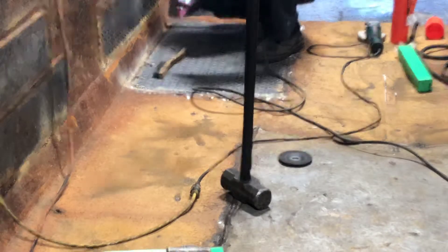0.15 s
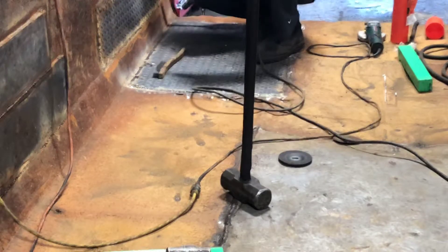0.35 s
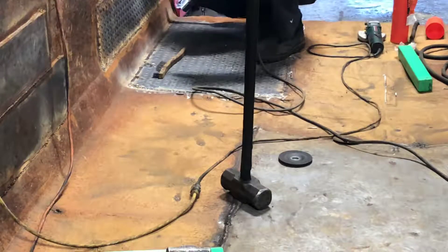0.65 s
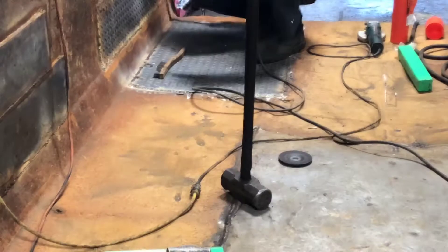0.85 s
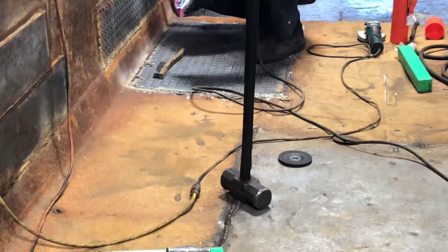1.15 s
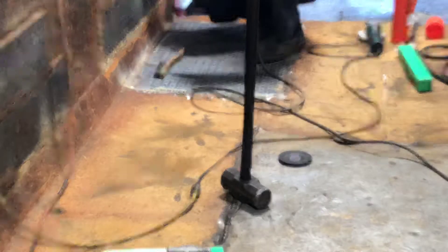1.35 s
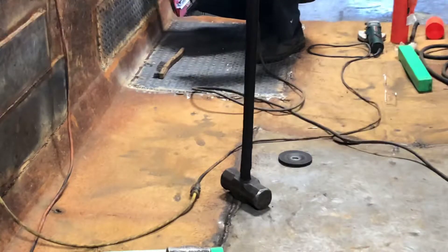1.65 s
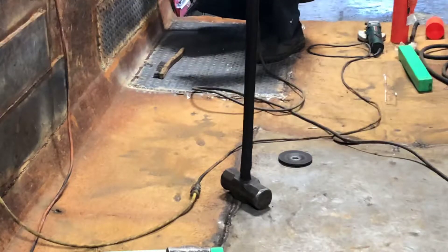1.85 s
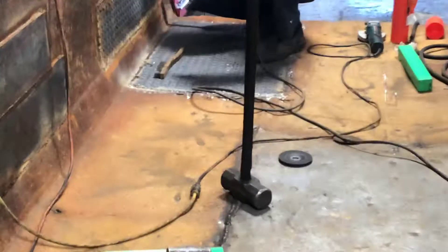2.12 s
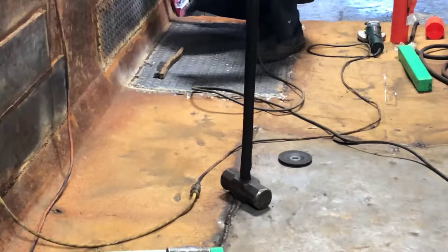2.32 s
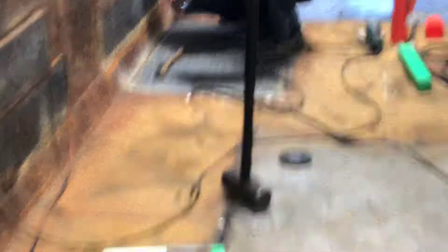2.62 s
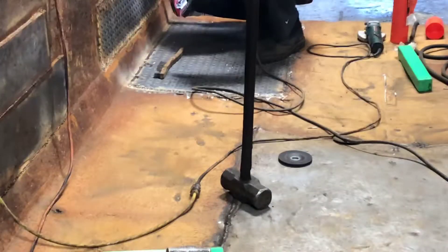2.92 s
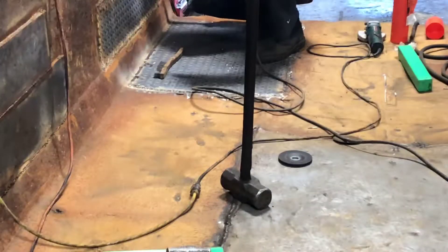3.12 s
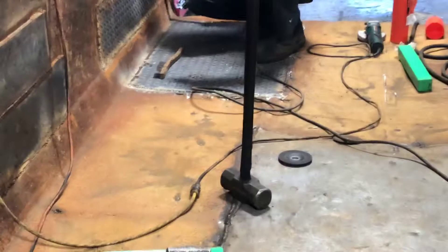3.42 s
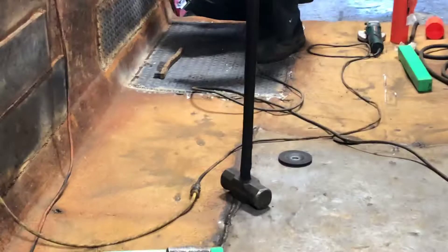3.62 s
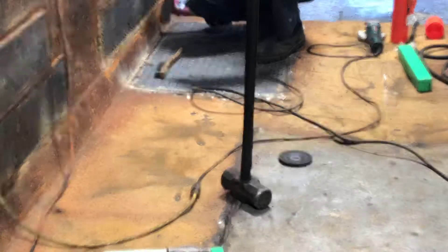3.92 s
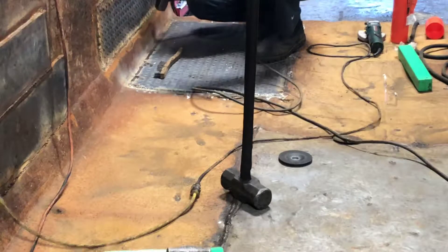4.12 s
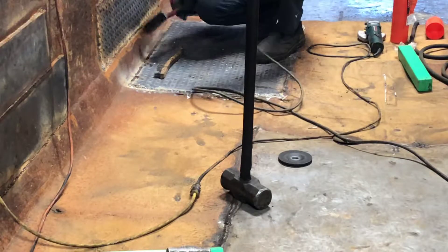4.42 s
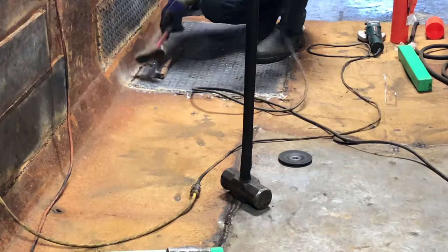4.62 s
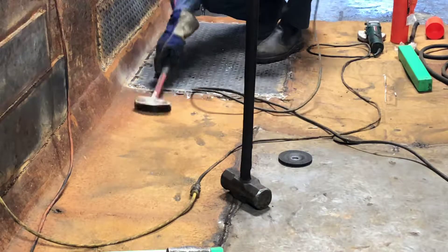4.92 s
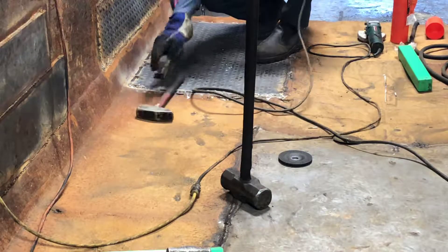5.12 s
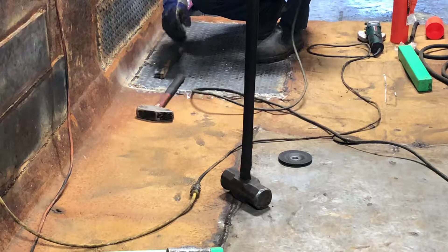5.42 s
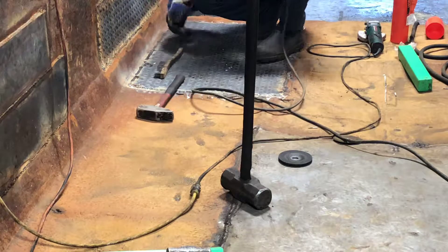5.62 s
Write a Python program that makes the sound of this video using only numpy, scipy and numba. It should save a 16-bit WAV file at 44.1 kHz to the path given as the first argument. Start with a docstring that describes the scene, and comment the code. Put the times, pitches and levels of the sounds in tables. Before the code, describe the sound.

The clip opens in the fading ring of an earlier hammer blow in a reverberant workshop. Seven heavy blows on a big steel plate body follow at about 0.1, 0.7, 1.3, 1.95, 2.6, 3.25 and 3.9 seconds. Each starts with a hard, bright metallic crack and spreads into a dense, mid-low boom with ringing that lasts into the next blow. Their colour shifts a little: the third is lower, the fifth brightest and most clangy. The last ring decays for about a second. From 4.9 to 5.3 seconds the hammer is laid on the steel floor, with a quick cluster of much quieter clacks ending in duller handle thuds. A deep, wavering floor hum near 120 hertz swells and fades. Soft clothing rustles appear around 5.2 and 5.7 seconds over a faint, low machine wash. A close phone microphone squashes the blows to similar loudness.

```python
"""In a workshop, seven even hammer blows land on a big steel plate body, while an earlier blow still hangs in the hall.
Each blow is a hard crack of noise and resonances, then a boom of noise and fading tones, spreading through plates and hall.
The hammer is then laid on the steel floor and rocks to rest: knocks of noise and tones, and a deep drone.
Clothes rustle (swelling noise) over a low steady wash of distant machines (noise).
A phone stands close by; its limiter flattens every blow."""
import sys
import numpy as np
from scipy import signal
from scipy.fft import rfft, irfft
from scipy.io import wavfile
from numba import njit

SR = 44100
rng = np.random.default_rng(int(sys.argv[2]) if len(sys.argv) > 2 else 0)


def dump_mix(stems):
    """Bounce the given channels to the path in sys.argv[1] as a 16-bit WAV at rate SR."""
    frames = np.atleast_2d(stems).T  # one column per channel
    limited = np.clip(frames, -1, 1)  # hard clip at full scale
    pcm = np.round(limited * 32767).astype(np.int16)
    wavfile.write(sys.argv[1], SR, pcm)


N = 253927  # length of the scene in samples
AGE = np.arange(2 * SR) / SR  # seconds since a blow or knock
TOP_HZ = 15850  # nothing much is heard above this

# How long plates and hall ring. Each row: frequency in Hz, time to fall by 60 dB in seconds.
RING_TIMES = [(60, 2.26), (160, 1.22), (420, 0.92), (1100, 1.362), (2900, 1.375), (5000, 0.99), (8000, 0.8),
              (14000, 0.71)]
# Colour of the crack of steel on steel. Each row: frequency in Hz, relative level in dB per Hz.
CRACK_COLOUR = [(100, -7), (250, 9), (800, -6.5), (1400, 2), (3000, -3.5), (4600, -2.5), (6500, -10),
                (8000, -8), (8500, -16), (15500, -31.5)]


def undb(db):
    """Turn decibels into a gain."""
    return 10 ** (np.asarray(db) / 20)


def unit(x):
    """Scale a sound to an average (rms) level of 1."""
    return x / np.sqrt(np.mean(x ** 2))


def lookup(table, hz):
    """Read between (Hz, value) points, with pitch on a logarithmic axis."""
    f, value = np.transpose(table)
    return np.interp(np.log(np.maximum(hz, 1)), np.log(f), value)


def colour(x, table):
    """Make each frequency louder or softer, following (Hz, dB) points."""
    hz = np.fft.rfftfreq(len(x), 1 / SR)
    return irfft(rfft(x) * undb(lookup(table, hz)), len(x))


def noise(table, size, patchy_db=0, patch_hz=40):
    """Coloured noise of rms 1; crowded modes can leave its spectrum uneven."""
    hz = np.fft.rfftfreq(size, 1 / SR)
    knots = np.arange(0, SR / 2, patch_hz)
    patches = np.interp(hz, knots, rng.standard_normal(len(knots)))
    gain = undb(lookup(table, hz) + patchy_db * patches)
    white = rng.standard_normal(size)
    return unit(irfft(rfft(white) * gain, size))


def fade(t60):
    """Die away steadily, by 60 dB in t60 seconds."""
    return np.exp(-np.log(1000) * AGE / t60)


def swell(seconds):
    """Build up energy with this time constant."""
    return 1 - np.exp(-AGE / max(seconds, 1e-4))


def resonance(x, hz, width):
    """Let one band through, as a resonance does, with gain 1 at its centre."""
    sharpness = max(hz / width, .6)
    return signal.lfilter(*signal.iirpeak(hz, sharpness, fs=SR), x)


def sharp_resonance(hz, width):
    """Noise rung through the same resonance twice, which narrows it further."""
    once = resonance(rng.standard_normal(len(AGE)), hz, width)
    return resonance(once, hz, width)


def damp(x):
    """Let each octave of a dense ring die at its own pace."""
    spectrum = rfft(x)
    octave = np.log2(np.clip(np.fft.rfftfreq(len(x), 1 / SR), 60, 15360) / 60)
    out = 0
    for k in range(9):
        t60 = lookup(RING_TIMES, 60 * 2 ** k)
        share = np.maximum(1 - abs(octave - k), 0)  # neighbouring octaves blend into each other
        out = out + irfft(spectrum * share, len(x)) * fade(t60)
    return out


def modes(rows, scatter_db):
    """Fading tones (Hz, dB, t60 s) of a plate; each contact point drives them a little differently."""
    chance = rng.standard_normal((len(rows), 2))
    out = 0
    for (hz, db, t60), (level_chance, phase_chance) in zip(rows, chance):
        tone = np.sin(2 * np.pi * (hz * AGE + phase_chance))
        out = out + undb(db + scatter_db * level_chance) * tone * fade(t60)
    return out


def add(track, start, sound):
    """Mix a sound in at a time in seconds; what lies outside the track is left off."""
    i = int(start * SR)
    part = sound[max(-i, 0):max(len(track) - i, 0)]
    track[max(i, 0):max(i, 0) + len(part)] += part


def workshop(shop_db=-42):
    """A low steady wash of distant machines, and clothes whose rustle swells and fades with each move."""
    # Colour of the background. Each row: frequency in Hz, relative level in dB per Hz.
    shop_colour = [(25, -36), (60, -27), (110, -16.5), (330, -8), (660, -12.5), (1300, -19.5),
                   (2700, -28.5), (5000, -30), (9000, -47), (15000, -62)]
    # Colour of rubbing cloth. Each row: frequency in Hz, relative level in dB per Hz.
    cloth_colour = [(1000, 22.5), (3800, 8), (6500, 7.5), (8000, 7.5), (8800, -5), (15000, -13)]
    # The worker lets go of the hammer, then draws back.
    # Each row: height of the move in seconds, half length in seconds, level in dB.
    moves = [(5.2, 0.32, -42), (5.66, 0.19, -40.5)]
    t = np.arange(N) / SR
    rustle = sum(undb(db) * np.exp(-((t - s) / half_s) ** 2) for s, half_s, db in moves)
    return undb(shop_db) * noise(shop_colour, N) + rustle * noise(cloth_colour, N, patchy_db=3.5)


def crowd():
    """The plates' countless overlapping modes, some strong and some weak, as patchy noise."""
    # Colour of the dense ring of plates and hall. Each row: frequency in Hz, relative level in dB per Hz.
    boom_colour = [(30, -51), (60, -11.5), (160, -4), (330, -0.5), (540, 2.5), (800, -8), (1200, -9),
                   (1700, -16), (3000, -20), (4400, -19), (6500, -24), (8000, -26), (8400, -31.5),
                   (15500, -49)]
    return noise(boom_colour, len(AGE), patchy_db=3, patch_hz=32)


def boom(boom_hz, hard_db, stiffness, own, rise_s=0.02, modes_rise_s=0.03, dense_db=-5.5, modes_db=12.5,
         hang=0.98, cluster_db=-8, cluster_width_hz=55, cluster_t60=0.62):
    """Bending waves spread through the plates; part of the pattern repeats, part shifts with the contact point."""
    # Strongest modes of the plate. Each row: frequency in Hz, level among the modes in dB.
    plate = [(61.9, -41.5), (92.9, -41), (119.8, -41), (238.2, -28), (279.9, -40.5), (332.4, -28),
             (356.6, -28.5), (425.3, -46), (507.4, -29.5), (528.9, -26.5), (586.8, -30.5), (686.4, -40),
             (706.6, -46), (940.7, -39), (1082.0, -44), (1266.4, -44)]
    # A fully stiff spot gives less bass than a yielding one. Each row: frequency in Hz, change in dB.
    stiff_spot = [(250, -5.5), (540, 0), (1100, -1.5), (4000, -1)]
    # Only the stiffest spots add a clang. Each row: frequency in Hz, change at full stiffness in dB.
    clang_colour = [(600, 0.5), (1050, 8), (1600, 0.5), (3000, 4.5), (6000, -1)]
    clang_power = 3.2  # the clang grows with this power of the stiffness
    # a harder blow leaves a brighter ring: dB per dB of hardness and per octave above this pitch
    bright_from_hz, bright_per_octave = 2400, 0.69

    stiffness = np.clip(stiffness, 0, 1)
    tint = [(hz, stiffness * db) for hz, db in stiff_spot]
    clang = [(hz, stiffness ** clang_power * db) for hz, db in clang_colour]
    top_db = hard_db * bright_per_octave * np.log2(TOP_HZ / bright_from_hz)
    bright = [(bright_from_hz, 0), (TOP_HZ, top_db)]

    pattern = unit(.5 * own + crowd())
    tinted = colour(pattern, tint)
    clanging = colour(tinted, clang)
    dense = damp(colour(clanging, bright))

    rows = [(hz, db + lookup(tint, hz), hang * lookup(RING_TIMES, hz)) for hz, db in plate]
    lines = modes(rows, scatter_db=2.5)
    # each contact point favours one tight cluster of modes
    cluster = unit(sharp_resonance(boom_hz, cluster_width_hz)) * fade(cluster_t60)
    # the strong low modes take longer to build up than the dense ring
    strong = undb(modes_db) * lines + undb(cluster_db) * cluster
    return undb(dense_db) * dense * swell(rise_s) + strong * swell(modes_rise_s)


def crack(clank_hz, t60=0.065, ring_db=-3, clank_db=-5, clank_width_hz=200, rise_s=0.0027,
          walls_db=-20, walls_t60=0.39):
    """Steel meets steel: a noise burst, a few broad resonances and one clank; near walls throw it back."""
    # Resonances at the point of contact. Each row: frequency in Hz, width in Hz, gain in dB.
    contact = [(1244, 170, 9.5), (2340, 94, 10), (3970, 490, -2), (4720, 420, 1.5), (7610, 170, -5),
               (9440, 110, -10)]
    burst = noise(CRACK_COLOUR, len(AGE), patchy_db=3.5, patch_hz=130)
    body = sum(undb(db) * resonance(rng.standard_normal(len(AGE)), hz, width) for hz, width, db in contact)
    clank = sharp_resonance(clank_hz, clank_width_hz)
    # a quick fade, and a weaker, slower one for the walls
    shape = (fade(t60) + undb(walls_db) * fade(walls_t60)) * swell(rise_s)
    return (burst + undb(ring_db) * unit(body) + undb(clank_db) * unit(clank)) * shape


def hammering(crack_db=-3, lead_s=.008, lead_db=-18, earlier_db=4):
    """Every blow: a forerunner through the steel floor, the crack through the air, and the boom."""
    # The hammer blows. Each row: start in seconds, pitch of the boom in Hz, pitch of the clank in Hz,
    # hardness against an average blow in dB, stiffness of the struck spot from 0 to 1.
    blows = [(0.1005, 339, 4020, 2.5, 0), (0.6965, 505, 4090, -1.2, 0.4), (1.3234, 288, 4340, 1, 0.18),
             (1.9503, 508, 4350, -.5, 0.26), (2.6001, 541, 4060, -0.5, 0.97), (3.2375, 522, 3960, -2, 0.76),
             (3.9168, 497, 3800, -0.3, 0.4)]
    earlier_blow_s, earlier_boom_hz = -0.48, 560  # the blow before still hangs in the hall
    out = np.zeros(N)
    own = crowd()  # the part of the plates' pattern that every blow shares
    for s, boom_hz, clank_hz, hard_db, stiffness in blows:
        forerunner = crowd() + 1.32 * noise(CRACK_COLOUR, len(AGE))
        add(out, s - lead_s, undb(lead_db) * forerunner * swell(0.0038) * fade(0.17))
        add(out, s, undb(crack_db + hard_db) * crack(clank_hz))
        add(out, s, boom(boom_hz, hard_db, stiffness, own))
    add(out, earlier_blow_s, undb(earlier_db) * boom(earlier_boom_hz, 0, 0, own))
    return out


def laying_down(drone_db=-15, tick_t60=0.48, clack_db=-2, clack_t60=0.082):
    """Head and handle knock on the floor plate and set it droning; the head clacks and rings, the handle thuds."""
    # The hammer is laid down and rocks. Each row: start in seconds, strength in dB,
    # share taken by the steel head rather than the handle from 0 to 1, pitch the spot favours in Hz.
    knocks = [(4.916, -20, 0.9, 544), (4.954, -18.5, 0.88, 232), (5.026, -21, 0.97, 260),
              (5.074, -27.5, 0.92, 230), (5.157, -20, 0.36, 450), (5.272, -22.5, 0, 220)]
    # Modes of the floor plate. Each row: frequency in Hz, level among the modes in dB, 60 dB fade in seconds.
    floor_modes = [(200, -3.5, .3), (226.6, -3, 0.53), (239.8, 1.5, 0.42), (338, -5.5, 0.34),
                   (428, -6, 0.59), (532, -2.5, 0.24)]
    # Colour of the floor's thud. Each row: frequency in Hz, relative level in dB per Hz.
    thud_colour = [(35, -34), (90, -6.5), (150, -4), (230, 5), (540, -1.5), (750, -8), (1400, -20),
                   (1900, -34), (4200, -44), (8000, -49), (15000, -76)]
    # Colour of the hammer's tick on the floor plate. Each row: frequency in Hz, relative level in dB per Hz.
    tick_colour = [(150, -19), (500, 12), (900, 2), (1400, 5.5), (2000, -7.5), (4000, -13), (7000, -22),
                   (15000, -52)]
    # A gentle contact has less top than a blow. Each row: frequency in Hz, change in dB.
    clack_dulling = [(4000, -1), (15000, -22)]
    handle_tick_db, head_tick_db = -15.5, 0  # tick against thud, when the handle or the head lands
    handle_ring_db, head_ring_db = -3.5, 11  # ring of the floor plate against thud, likewise
    contact_s, spread_s = .002, 0.0055  # build-up of the tick, and of thud and ring spreading in the floor
    off_pitch_db = -12  # per octave: modes far from the favoured pitch are driven less
    drone_from_s = 5.13  # the deep ring of the floor emerges as the rocking ends

    out = np.zeros(N)
    for s, strength_db, head, spot_hz in knocks:
        tick_db = handle_tick_db + head * (head_tick_db - handle_tick_db)
        ring_db = handle_ring_db + head * (head_ring_db - handle_ring_db)
        driven = [(hz, db + off_pitch_db * abs(np.log2(hz / spot_hz)), t60) for hz, db, t60 in floor_modes]
        thud = damp(noise(thud_colour, len(AGE), patchy_db=3.0))
        ring = undb(ring_db) * modes(driven, scatter_db=0.5)
        clack = colour(noise(CRACK_COLOUR, len(AGE)), clack_dulling) * fade(clack_t60)
        tick = noise(tick_colour, len(AGE)) * fade(tick_t60) + undb(clack_db) * clack
        knock = (thud + ring) * swell(spread_s) + undb(tick_db) * tick * swell(contact_s)
        add(out, s, undb(strength_db) * knock)
    add(out, drone_from_s, undb(drone_db) * drone())
    return out


def drone(hz=119, width_hz=8, rise_s=0.19, t60=1.62):
    """A deep ring of the whole floor: noise in one narrow band builds up, wavers and fades."""
    narrow_band = sharp_resonance(hz, width_hz)
    return unit(narrow_band) * swell(rise_s) ** 2 * fade(t60)


def scene():
    """All sources at one microphone."""
    return (hammering() + laying_down() + workshop())[None]


@njit
def follow(size, attack, release):
    """Track the peaks of a sound: rise fast, sink slowly."""
    out, e = np.empty(len(size)), 0.
    for i in range(len(size)):
        e = max(e + attack * (size[i] - e), e * (1 - release))
        out[i] = e
    return out


def top_cut(x):
    """Steep low-pass: take away the highest treble."""
    low_pass = signal.ellip(10, .05, 60, TOP_HZ, fs=SR, output="sos")
    return signal.sosfiltfilt(low_pass, x, padtype="even")


def record(dry, attack_s=0.00046, release_s=0.083, threshold_db=-2):
    """A fast limiter holds every blow near full scale, slipped-through peaks are rounded, and the top is cut."""
    attack = min(1 / (attack_s * SR), 1.)
    envelope = follow(abs(dry[0]), attack, 1 / (release_s * SR))
    held = dry / np.maximum(envelope / undb(threshold_db), 1)
    rounded = held / (1 + held ** 8) ** (1 / 8)
    return top_cut(.95 * rounded)


dry = scene()
out = record(dry)
dump_mix(out)
```